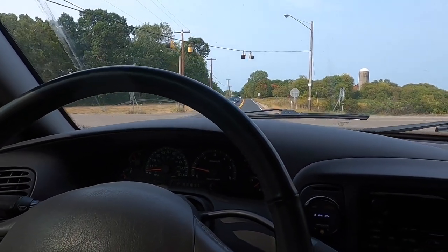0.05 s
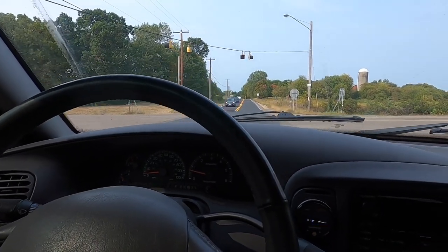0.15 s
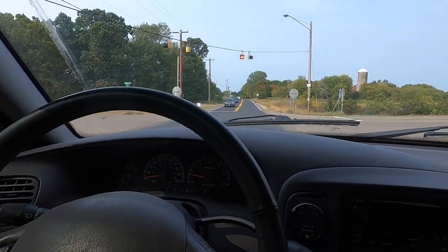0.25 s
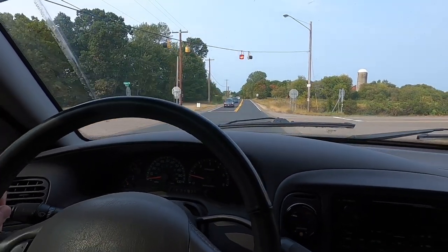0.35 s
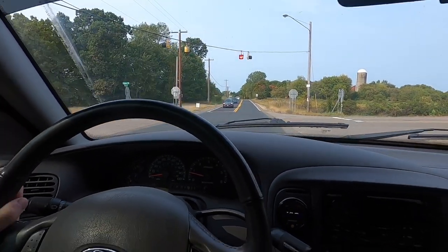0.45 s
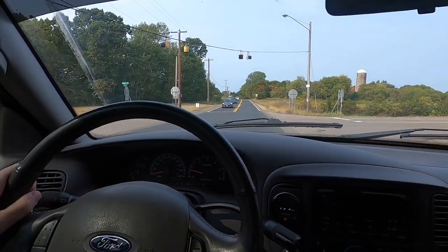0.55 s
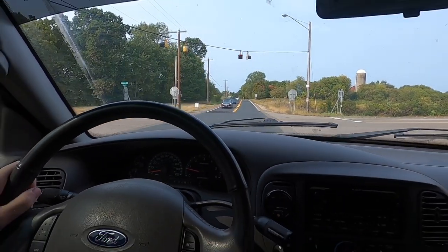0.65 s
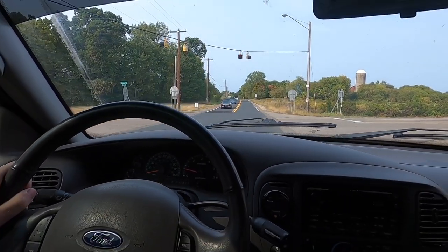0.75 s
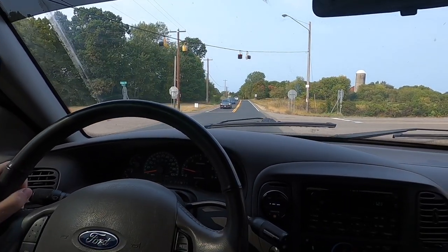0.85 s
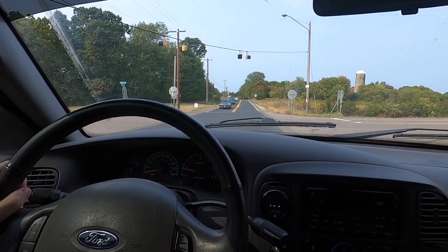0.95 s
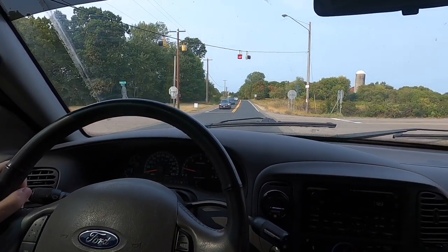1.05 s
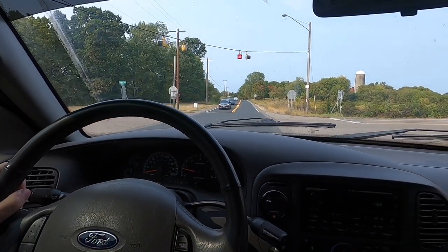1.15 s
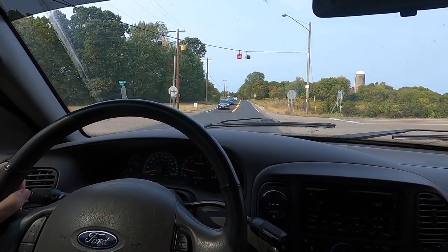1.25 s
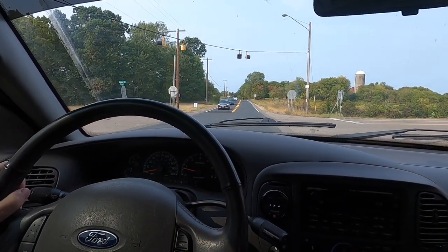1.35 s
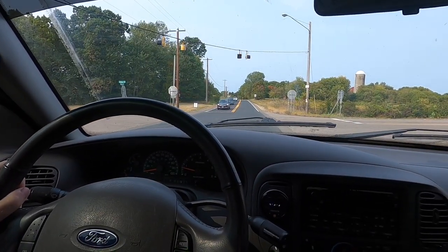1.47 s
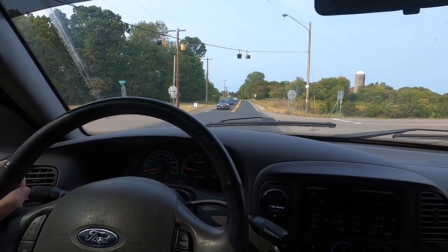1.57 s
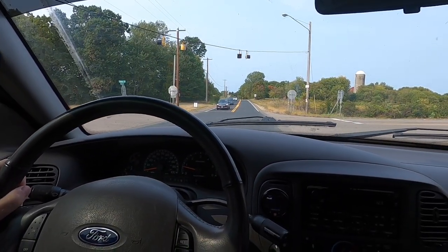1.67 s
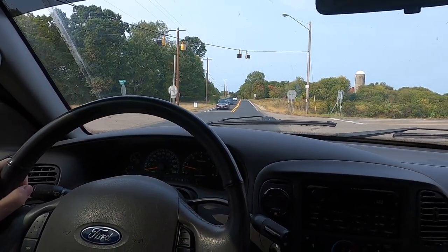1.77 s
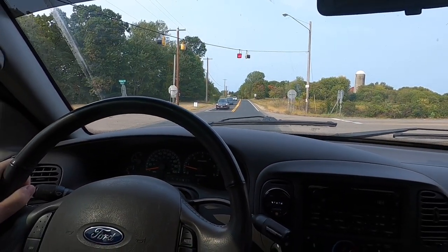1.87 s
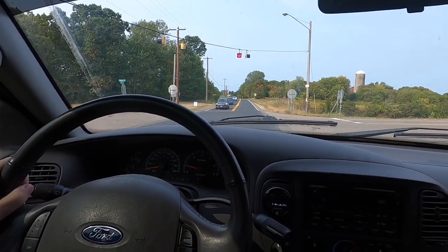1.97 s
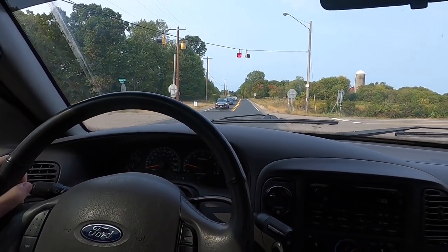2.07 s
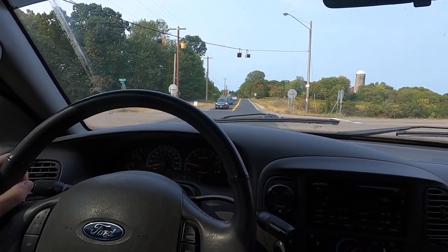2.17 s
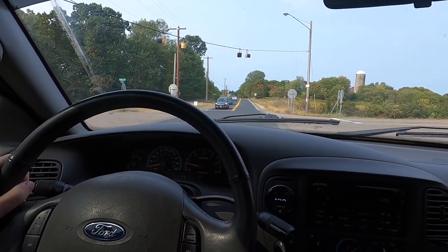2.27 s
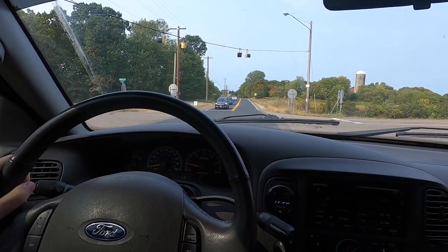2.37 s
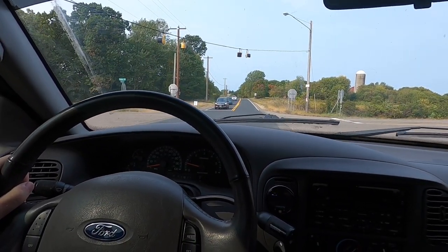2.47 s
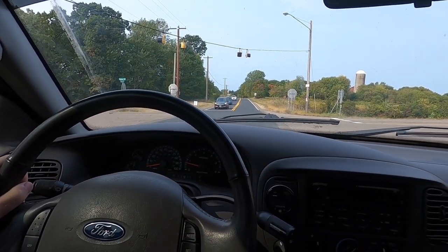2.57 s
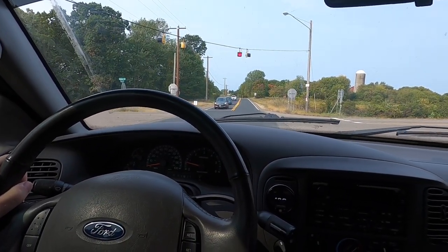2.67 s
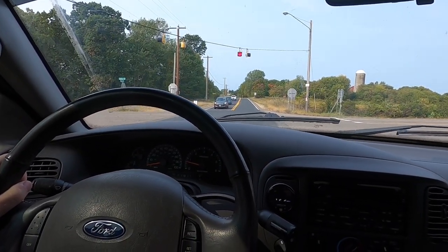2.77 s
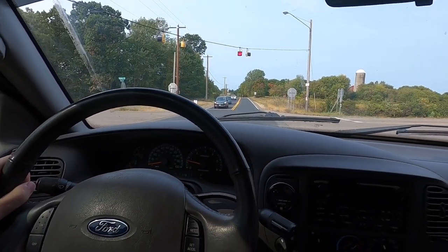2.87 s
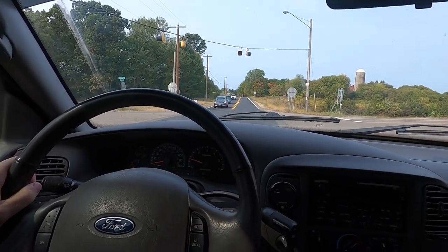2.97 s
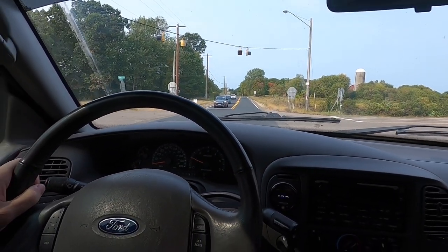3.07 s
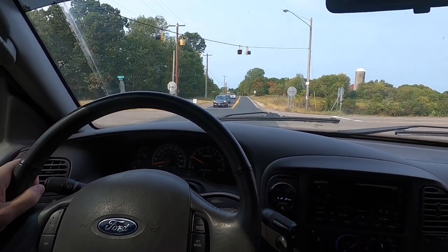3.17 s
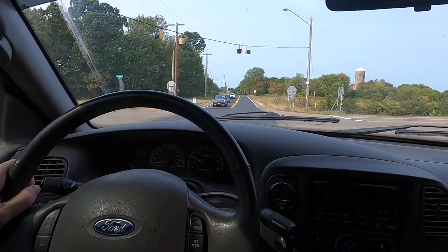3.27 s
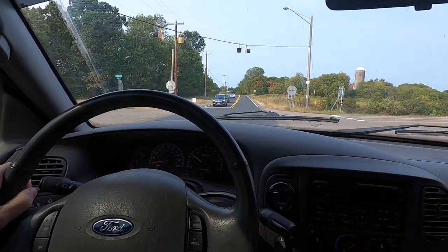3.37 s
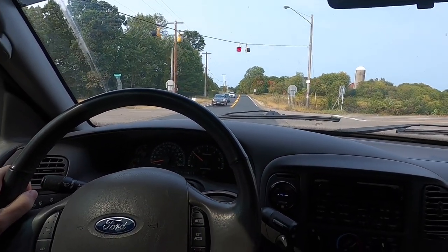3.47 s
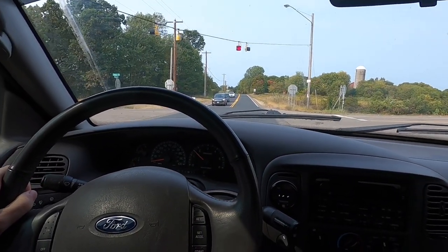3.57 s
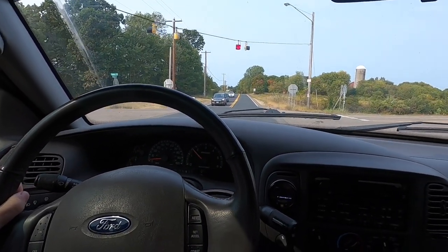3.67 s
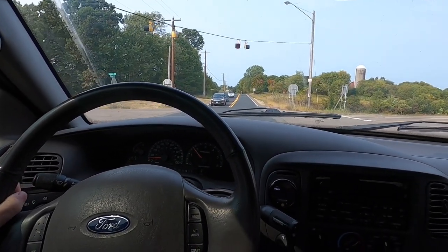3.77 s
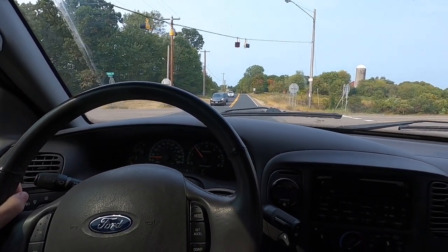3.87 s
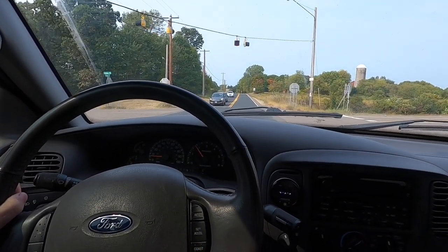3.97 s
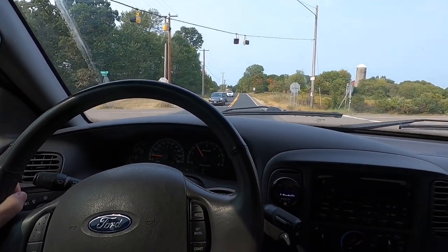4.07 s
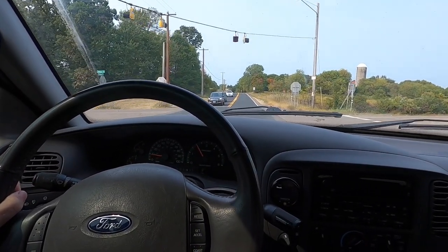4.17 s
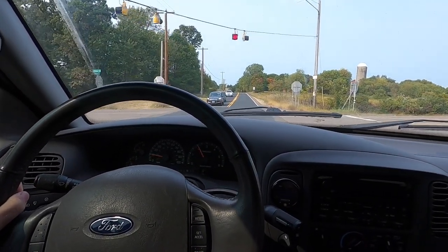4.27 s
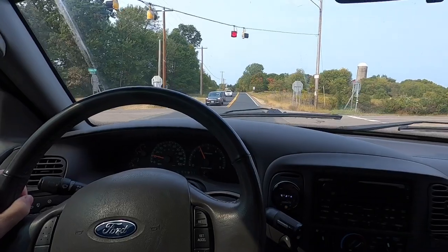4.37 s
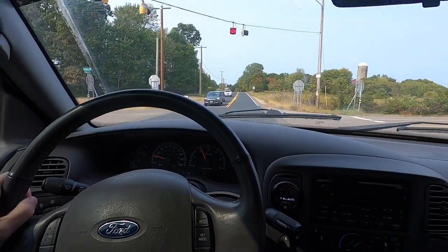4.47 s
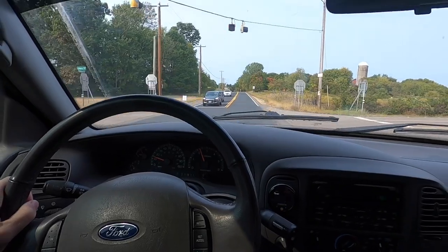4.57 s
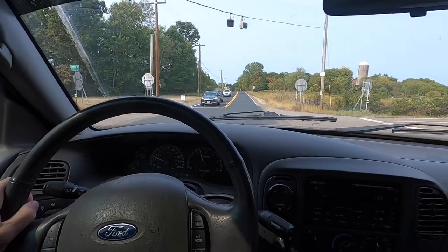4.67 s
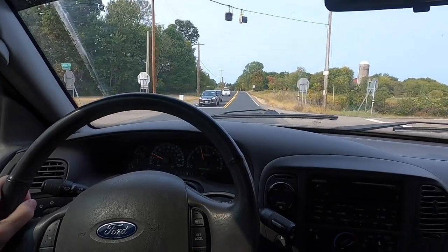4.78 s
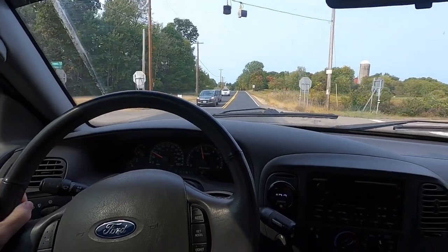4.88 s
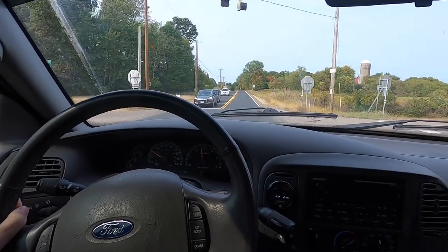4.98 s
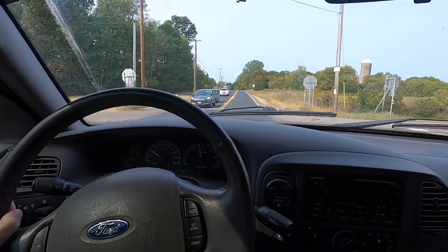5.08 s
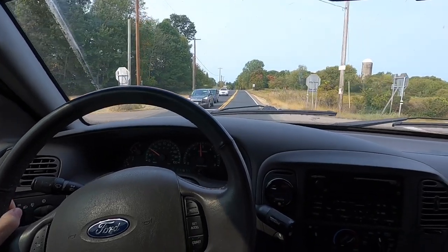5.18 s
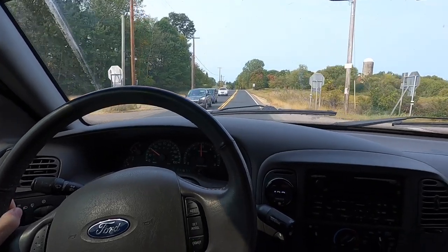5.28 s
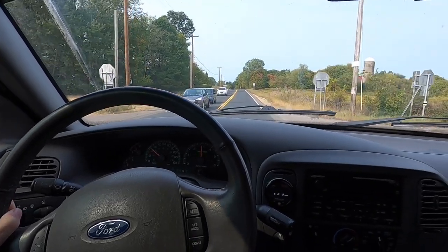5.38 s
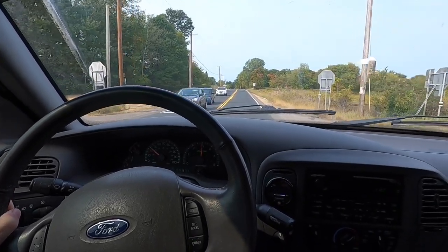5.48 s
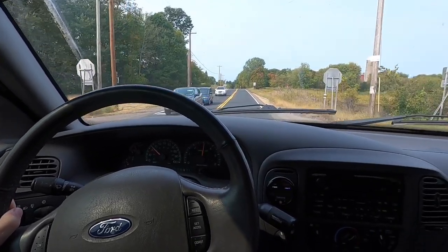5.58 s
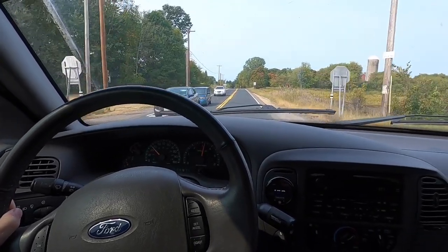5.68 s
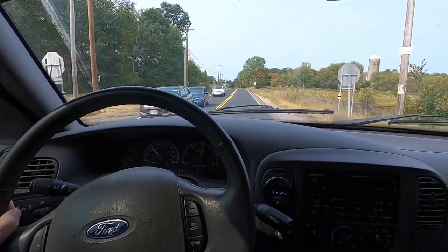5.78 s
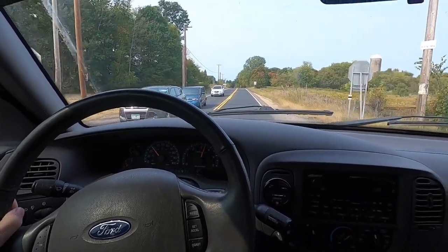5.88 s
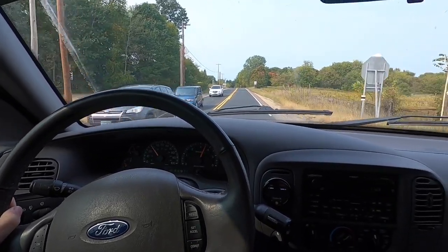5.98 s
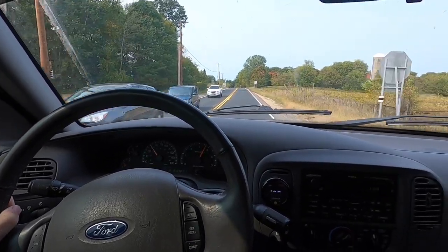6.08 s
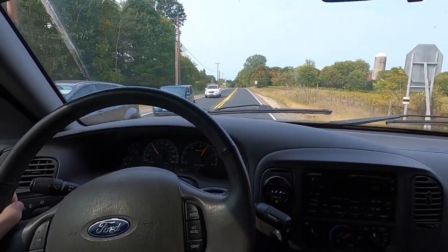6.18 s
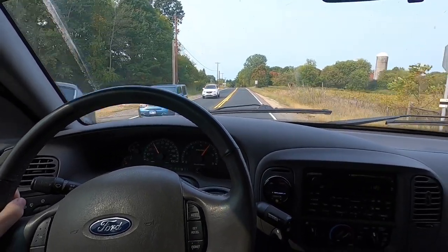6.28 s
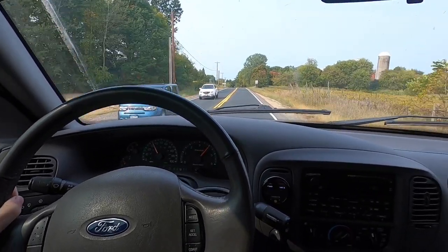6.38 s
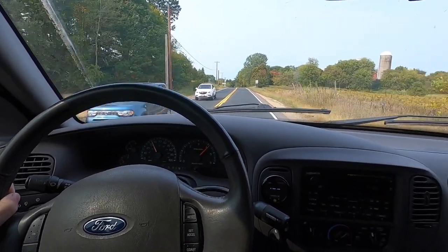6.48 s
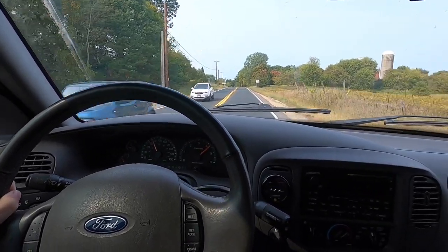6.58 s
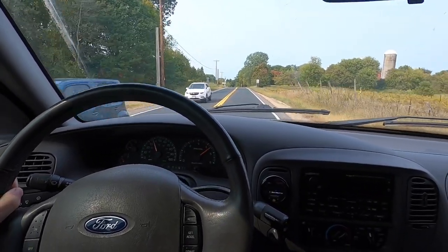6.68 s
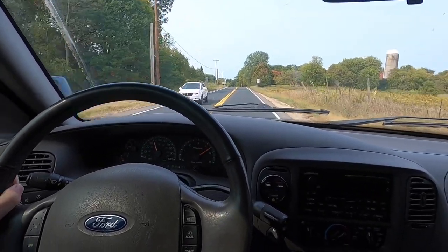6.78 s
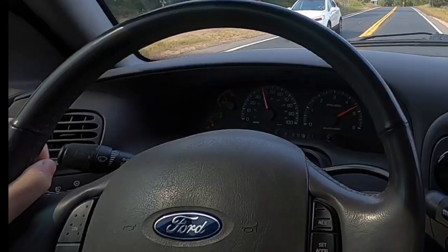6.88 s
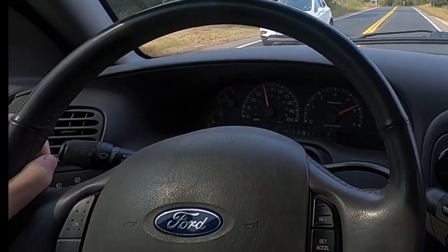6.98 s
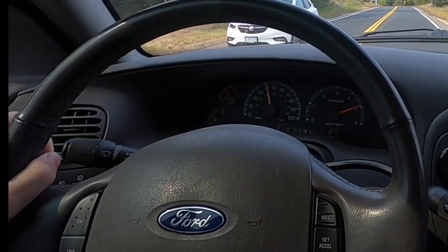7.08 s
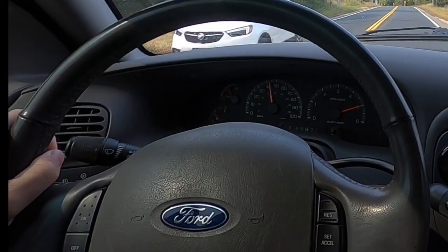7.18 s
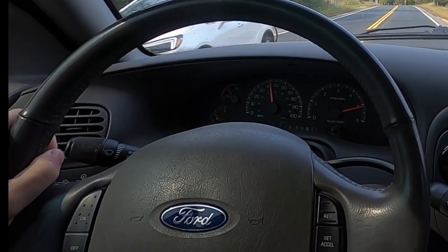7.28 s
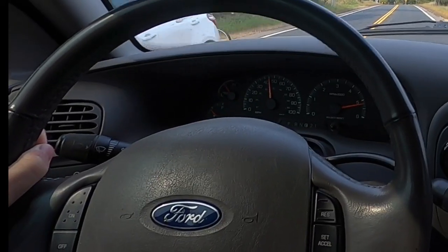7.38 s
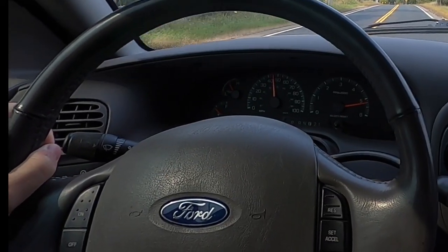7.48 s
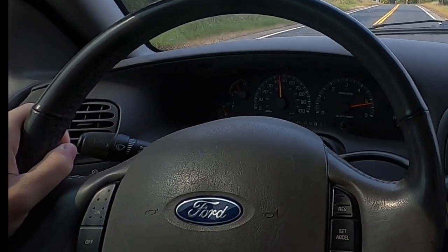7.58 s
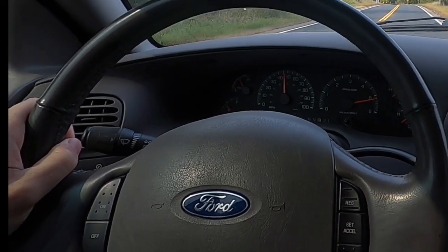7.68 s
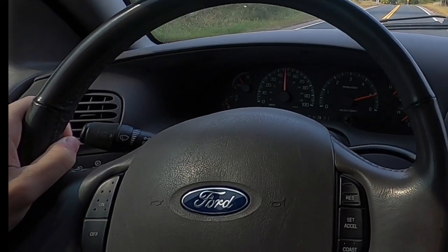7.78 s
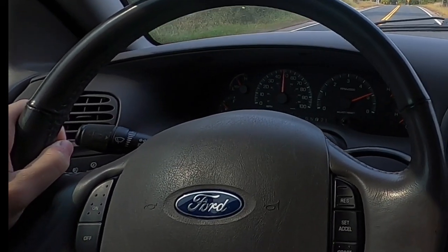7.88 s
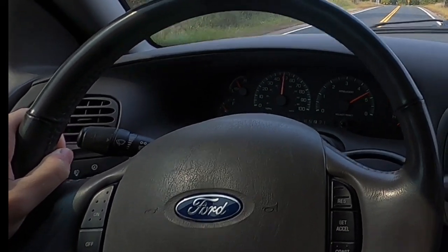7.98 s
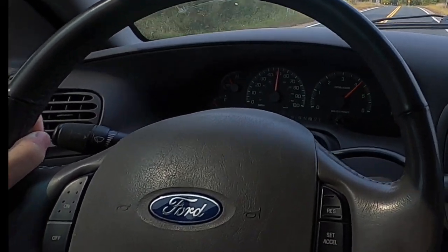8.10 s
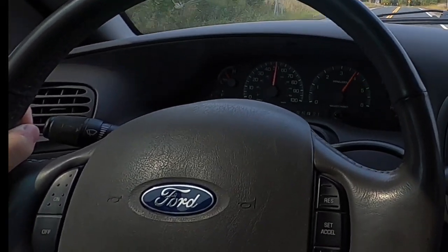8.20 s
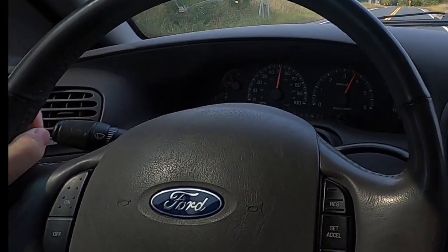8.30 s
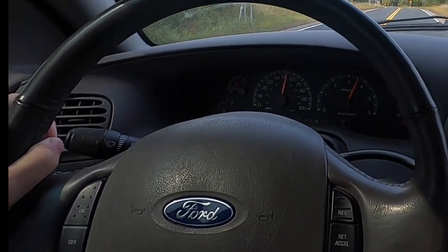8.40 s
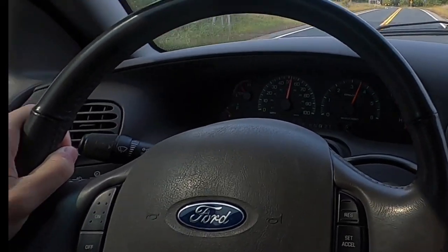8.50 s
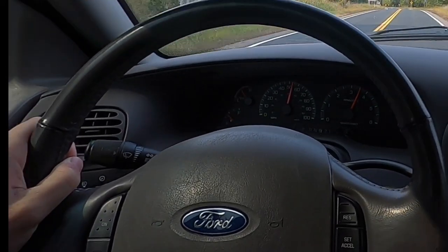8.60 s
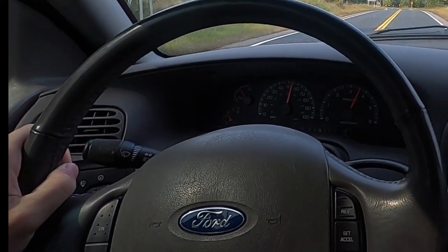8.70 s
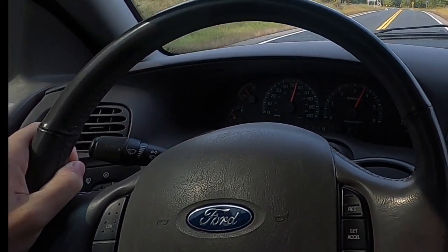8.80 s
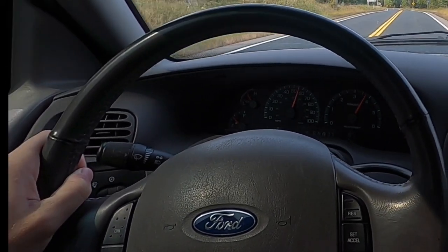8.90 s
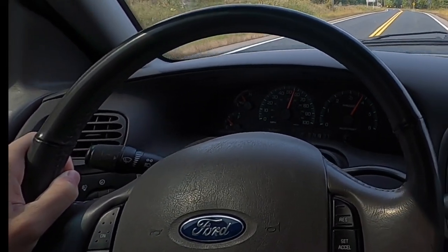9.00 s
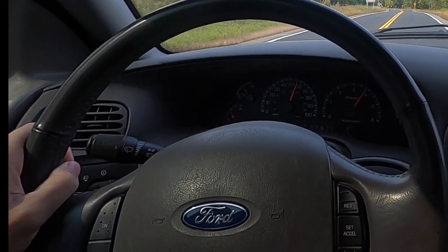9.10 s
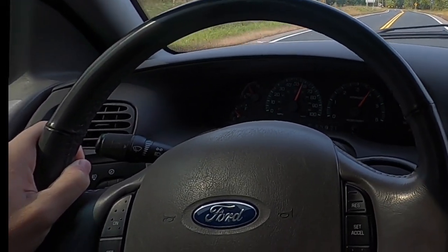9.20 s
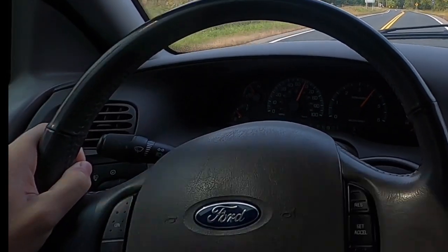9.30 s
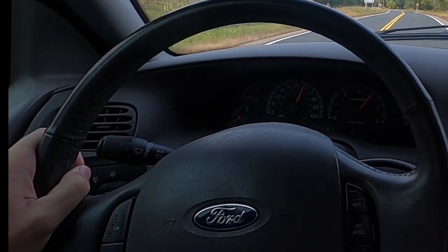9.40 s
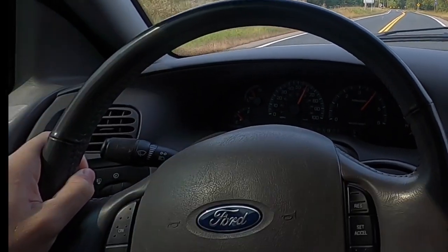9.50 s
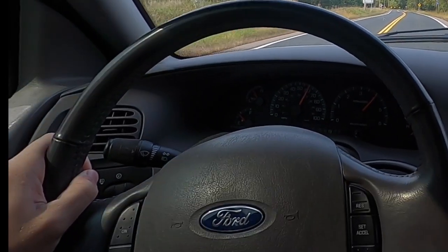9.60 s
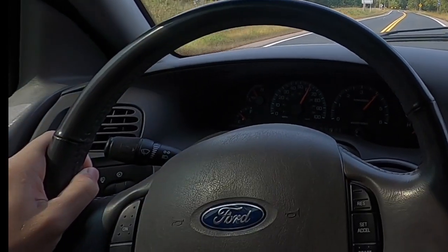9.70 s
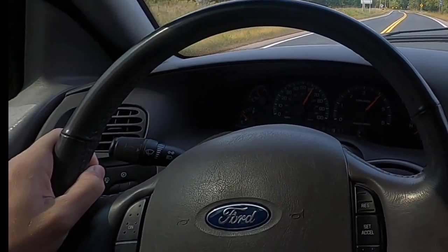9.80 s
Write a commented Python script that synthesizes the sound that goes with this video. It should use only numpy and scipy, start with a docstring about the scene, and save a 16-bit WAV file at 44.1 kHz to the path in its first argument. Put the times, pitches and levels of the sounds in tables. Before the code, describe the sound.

A quiet, low idle rumbles in the cab for under three seconds, with light cloth movement and a dull pedal knock. The big engine then lugs off the mark, dash trim rattling briefly, and accelerates steadily. Uneven exhaust boom, intake hiss and turbo whistle rise together, dip sharply through a single gear change, then build once more. Close stereo microphone at the driver's position.

```python
"""Inside a turbocharged V8 truck

The engine idles, pulls away hard, changes up once and pulls again. Unevenly spaced exhaust pulses, summed
as harmonics of the cycle, boom in the cab. Filtered noise pulsing with the firings makes rumble, burble,
clatter and intake hiss; the turbo sighs, then whistles as a swept tone. A fan and small motors run on.
A sleeve rustles in noise strokes, a pedal thumps as decaying modes, and trim rattles at moving off."""
import sys
import numpy as np
from scipy.fft import rfft, irfft, next_fast_len
from scipy.io import wavfile
from scipy.ndimage import map_coordinates

SR = 44100
rng = np.random.default_rng(int(sys.argv[2]) if len(sys.argv) > 2 else 0)


def store_pcm(level_fs):
    """Save levels as 16-bit WAV."""
    pcm = np.round(np.clip(level_fs, -1, 1) * 32767).astype(np.int16)
    wavfile.write(sys.argv[1], SR, np.atleast_2d(pcm).T)


N = 434385
TIME = np.arange(N) / SR  # s

# engine speed: (time [s], speed [rpm])
ENGINE_SPEED = [(0.0, 625.5), (2.69, 632.5), (3.26, 1384), (3.837, 1907), (4.7, 2474), (4.87, 2664),
                (5.3, 2982), (5.75, 3503), (6.45, 4396), (6.84, 4865), (7.287, 5390), (7.607, 5083),
                (7.88, 4397), (8.06, 3470), (8.413, 3596), (9.093, 3987), (9.42, 4104), (9.85, 4240)]
# the driver's foot: (time [s], throttle opening [0-1])
THROTTLE = [(2.65, 0.06), (3.1, 0.17), (4.15, 0.45), (4.7, 1), (5.7, 0.74), (6.7, 1), (7.3, 0.87),
            (8.2, 0.95), (8.5, 0.72), (8.8, 0.96), (9.85, 1)]
# speed of the turbo: (time [s], whistle [Hz])
TURBO_SPEED = [(2.7, 300), (3.85, 1700), (4.9, 3900), (5.5, 4750), (6, 5620), (6.5, 6280), (6.9, 6760),
               (7.2, 6980), (7.47, 7020), (7.9, 5500), (8.1, 5130), (8.35, 5220), (8.6, 5860), (9, 6540),
               (9.4, 6890), (9.85, 7010)]
# booming orders of the four-stroke cycle, each in its own speed ranges:
# (order [cycles], from [rpm], to [rpm], edge [rpm], level [dB])
BOOM_RANGES = [(3, 1200, 3900, 69, -34.5), (3, 3270, 3723, 120, -10.5), (3, 4090, 6000, 76, -10.5),
               (4, 2400, 5700, 65, -39), (4, 3900, 4300, 87, -24), (4, 3750, 4090, 36, -11),
               (5, 1830, 3870, 190, -17), (5, 2520, 3297, 160, -8), (5, 3800, 5150, 110, -23),
               (8, 260, 1300, 110, -28.5), (8, 1160, 2380, 60, -23), (8, 1760, 2150, 30, -14.5),
               (8, 2400, 4000, 72, -33), (8, 3640, 4367, 79, -21), (8, 4225, 5700, 54, -23.5),
               (9, 2650, 2500, 57, -27), (16, 3030, 3300, 50, -31.5)]
# weaker exhaust orders: (order [cycles], relative level [dB])
WEAK_ORDERS = [(1.0, 9.5), (2.0, 2.5), (6.0, 4), (7.0, 0), (9.0, 1), (10.0, -2.5), (11.0, 5.5), (12.0, -1),
               (13.0, 7.5), (14.0, 3.8), (15.0, -1), (16.0, 10), (17.0, 4.5), (18.0, -10), (19.0, 5.5),
               (20.0, -11.5), (21.0, 7.5), (22.0, 4), (23.0, -2), (24.0, 2.5), (25.0, 1.5), (26.0, 1.5),
               (27.0, -1), (28.0, -6), (29.0, -10), (30.0, 1.5), (31.0, -7), (32.0, -4.5)]
# their path through pipe and cab: (frequency [Hz], gain [dB])
PIPE_RESPONSE = [(30, -12), (70, -2), (130, 7), (180, -1), (230, 0), (280, -1.5), (350, -5.5), (440, -4),
                 (520, -18), (620, -21), (720, -21), (900, -20), (1150, -23), (1500, -29)]
# chassis heaves: (time [s], half length [s], level [dB])
CHASSIS_HEAVES = [(2.915, 0.076, -25), (4.203, .25, -31), (4.578, .14, -23), (5.699, .2, -33.5),
                  (6.403, 0.14, -32.5), (7.969, .12, -27)]
# engine speeds at which the clatter flares or thins: (speed [rpm], half width [rpm], change [dB])
CLATTER_FLARES = [(3560, 200, -1), (4820, 310, 4)]
# strokes of the sleeve: (start [s], length [s], level [dB])
SLEEVE_STROKES = [(0.28, 0.24, -61), (0.466, 0.31, -57.5), (1.78, 0.18, -62.5), (1.948, 0.19, -54.5),
                  (2.02, 0.68, -69), (3.02, 0.16, -62)]
# pedal, driveline and trim knocks:
# (time [s], click [dB], click brightness [dB/octave], relative knock [dB], relative thump [dB])
CONTACTS = [(2.182, -56, 4, -42, -27), (2.551, -37.5, -1, -43.5, -13.5), (2.887, -68, -1, -56, -26),
            (2.915, -51, -8, -60, -34.5), (3.28, -57, -3, -69, -52.5), (3.545, -50, -6, -52, -47.5),
            (3.562, -45, -11, -40, -38), (3.64, -41.5, -12.5, -51.5, -44), (3.659, -39, -8, -42, -30.5),
            (3.682, -34.5, -14, -35.5, -42.5), (3.69, -35, -15.5, -32.5, -43),
            (3.73, -35.5, 8, -36.5, -49.5), (3.735, -41, 6.5, -50, -38)]
# modes of the floor pan: (frequency [Hz], relative level [dB], decay by 60 dB [s])
FLOORPAN_MODES = [(80.5, 2.5, 0.12), (131, -2.5, 0.18), (244.5, -5.5, 0.07), (408, -11, 0.066)]
# firewall and dash resonances: (frequency [Hz], width [Hz], gain [dB])
DASH_RESONANCES = [(540, 59, 2), (690.6, 33, 5.5), (820, 30, 2.5), (897, 72, 6), (1008, 66, 8),
                   (1119, 64, 9), (1304, 220, 7), (1476, 61, 10), (1563, 83, 9.5), (1680, 45, 6.5),
                   (1835, 97, 3.5), (2040, 35, 4.5), (2089, 31, -1.5), (2250, 19, 10.5), (2880, 90, 2.5),
                   (3080, 76, 3.5), (3340, 42, 5), (3420, 52, 1.5), (3820, 74, 4), (4110, 71, 5),
                   (4270, 40, 7.5), (4990, 81, 4.5), (5300, 120, 4), (5700, 260, 4)]
# small electric motors: (frequency [Hz], relative level [dB])
MOTOR_WHINE = [(931.3, -91.5), (1044, -75), (1120, -91.5), (1680, -83)]

# noise colours, each: (frequency [Hz], relative density [dB per Hz])
RUMBLE_COLOUR = [(6, -28.5), (15, -6.5), (27, 1), (45, -3.5), (65, -6.5), (100, -32.5), (200, -86.5)]
BURBLE_COLOUR = [(40, -37.5), (68, -5.5), (88, 3), (125, -1.5), (165, -6), (205, -10), (240, -9.5),
                 (300, -12.5), (410, -19.5), (490, -30.5), (620, -40), (1000, -59), (2000, -110)]
CLATTER_COLOUR = [(250, -40.5), (420, 10), (550, 3), (900, -1.5), (1300, -7), (1700, -15.5), (3000, -58.5)]
INTAKE_COLOUR = [(800, -31.5), (1300, -6), (1550, -4), (1900, -2), (2900, -3.5), (4200, -11.5), (5200, -20),
                 (8000, -56.5)]
AIR_COLOUR = [(2500, -30), (4300, -2), (5400, 0), (6000, -3), (7000, -2.5), (8300, -5), (9500, -14),
              (11000, -18), (15000, -31)]
CLOTH_COLOUR = [(900, -4), (2000, 0.5), (3300, -1.5), (6000, -5.5), (8000, -11.5), (10000, -24),
                (15000, -44)]
FAN_COLOUR = [(200, -15.5), (500, 0), (800, -4), (1100, 2), (1400, -5), (1650, -4.5), (2000, -10.5),
              (3500, -19), (5500, -17), (8000, -25), (11000, -40), (15000, -51.5)]
CLICK_COLOUR = [(400, -37), (1400, -5), (3300, 2), (6000, -10), (9000, -25), (14000, -38)]
KNOCK_COLOUR = [(150, -20), (400, 11.5), (800, -6), (1500, -8), (2500, -26), (6000, -54)]
TRIM_COLOUR = [(600, -31), (770, -4.5), (900, -15), (1130, -2), (1300, -15.5), (1560, -3.5), (1750, -9.5),
               (2200, -16.5), (3200, -42)]

# how each layer follows the engine: (level flat out [dB], speed [dB per doubling],
# no boost to full [dB], shut throttle to open [dB], extra in the gear change [dB])
EXHAUST_LAW = (-30.5, -0.44, 18.5, 0.5, -1.5)
BURBLE_LAW = (-32.5, -2, 0.7, -0.3, -0.5)
ROAR_LAW = (-36.5, 0, 3, -3, 1.5)
CLATTER_LAW = (-33, 4, 7, 12.5, 6)
INTAKE_LAW = (-37.5, 4, 1.05, 19.5, -1)
AIR_LAW = (-52, 4.3, 6, 6, -3.8)
WHISTLE_LAW = (-59.5, -2, 6.5, 6.5, -3.5)

# likeness of the two sides of a diffuse noise: (frequency [Hz], correlation [0-1])
LIKENESS = [(60, .99), (250, .97), (500, .8), (1100, .92), (2500, .68), (5000, .3), (10000, .25)]
# left level above right: (frequency [Hz], difference [dB])
LEFT_LEAN = [(30, -7), (60, 2.1), (130, 1.4), (290, 2.5), (640, 1.5), (1410, 1), (3100, 4), (7000, 0.5)]
# left phase behind right: (frequency [Hz], lag [radians])
LEFT_LAG = [(50, .02), (130, 0.22), (300, 0.37), (600, 0.41), (950, .2), (1550, 0.66), (6400, .8)]

TOP_HZ = 15700  # band limit
FULL_RPM, FULL_BOOST_HZ = 5000, 7000  # engine speed and whistle that count as flat out
LAUNCH_S, LAUNCH_RISE_S = 2.78, .12
SHIFT_S, SHIFT_WIDTH_S = 7.82, .28
BITE_S, BITE_WIDTH_S, BITE_DB = 7.955, .05, -8  # the next gear bites and the boom ducks
IDLE_RUMBLE_DB, ROAD_RUMBLE_DB, IDLE_BURBLE_DB = -34, -35.5, -36.5
LUG_RPM, LUG_WIDTH_RPM, LUG_DB = 1730, 350, 5  # extra burble while the engine lugs
SPOOL_HZ, SPOOL_WIDTH_HZ, SPOOL_DB = 2790, 800, -54.5  # turbo speeds at which the compressor sighs
BUZZ_S, BUZZ_DB, BUZZ_FADE_DB_PER_S = 3.666, -44, 46.5  # trim peak, and its fall to either side


def amp(db):
    """Logarithmic level: decibels become a pressure ratio."""
    return 10 ** (np.asarray(db) / 20)


def unit(x):
    """Energy normalisation: scale to rms 1."""
    return x / np.sqrt(np.mean(x ** 2) + 1e-20)


def along(points, hz):
    """Logarithmic pitch axis: read (Hz, value) points between knots."""
    f, v = np.transpose(points)
    return np.interp(np.log(hz + 1), np.log(f + 1), v)


def curves(rows):
    """Linear interpolation: one value per sample for each column after the time."""
    s, *columns = np.transpose(rows)
    return [np.interp(TIME, s, column) for column in columns]


def swell(x, centre, width):
    """Gaussian bell: 1 at the centre, 1/e one width away."""
    return np.exp(-((x - centre) / width) ** 2)


def wobble(rate):
    """Band-limited randomness: a smooth curve through rate random knots a second."""
    knots = rng.standard_normal(int(N * rate / SR) + 4)
    coarse = np.arange(0, N + 16, 16)
    smooth = map_coordinates(knots, [coarse * rate / SR], mode="nearest")
    return np.interp(np.arange(N), coarse, smooth)


def filtered(x, response):
    """Linear filtering: multiply the spectrum by a response of frequency."""
    m = next_fast_len(N + SR // 4)
    return irfft(rfft(x, m) * response(np.fft.rfftfreq(m, 1 / SR)), m)[..., :N]


def panels(hz):
    """Modal transmission: narrow dash resonances stand above the flat leakage."""
    grid = np.arange(0, SR // 2, 4)
    db = sum(peak_db / (1 + (2 * (grid - centre) / width) ** 4)
             for centre, width, peak_db in DASH_RESONANCES)
    return amp(np.interp(hz, grid, db))


def rush(colour, through_dash=False):
    """Diffuse field: stereo noise of rms 1 whose sides grow less alike toward the treble."""
    def response(hz):
        turn = np.arccos(np.clip(along(LIKENESS, hz), -1, 1)) / 2
        ring = panels(hz) if through_dash else 1
        return amp(along(colour, hz)) * ring * np.array([np.cos(turn), np.sin(turn)])
    mid, side = filtered(rng.standard_normal((2, N)), response)
    return unit(np.array([mid + side, mid - side]))


def boost():
    """Centrifugal compression: boost pressure grows with the square of turbo speed."""
    return (curves(TURBO_SPEED)[0] / FULL_BOOST_HZ) ** 2


def launched():
    """Load gate: 0 at idle, 1 once the engine pulls."""
    return np.clip((TIME - LAUNCH_S) / LAUNCH_RISE_S, 0, 1)


def level(law):
    """Source strength: a layer's dB follows engine speed, boost, throttle and the gear change."""
    full_db, speed_db, boost_db, throttle_db, shift_db = law
    rpm, = curves(ENGINE_SPEED)
    throttle, = curves(THROTTLE)
    db = full_db + speed_db * np.log2(rpm / FULL_RPM)
    db = db + boost_db * (boost() - 1) + throttle_db * (throttle - 1)
    return db + shift_db * swell(TIME, SHIFT_S, SHIFT_WIDTH_S)


def crank(flutter):
    """Four-stroke kinematics: two turns make one cycle, whose angle advances with a slight flutter."""
    cycle_hz = curves(ENGINE_SPEED)[0] / 120
    angle = 2 * np.pi * np.cumsum(cycle_hz * (1 + flutter * wobble(25))) / SR
    return cycle_hz, angle


def throb(angle, firing, lope):
    """Pulsating flow: gas swells at each of eight firings, and with the strongest cylinders each cycle."""
    return unit(np.exp(firing * np.cos(8 * angle) + lope * (np.cos(3 * angle) + np.cos(angle))))


def boom(angle, waver_db):
    """Cavity resonance: uneven banks let orders 3, 4 and 5 take turns with the firing order in the cab."""
    rpm, = curves(ENGINE_SPEED)
    gains = {}
    for k, low, high, edge, db in BOOM_RANGES:
        above = 1 + np.tanh((rpm - low) / edge / 2)
        below = 1 + np.tanh((high - rpm) / edge / 2)
        gain = amp(db) * above * below / 4
        gains[k] = np.maximum(gains.get(k, 0), gain)  # the louder range of an order wins
    out = 0
    for k, gain in gains.items():
        tone = np.sin(k * angle + rng.uniform(0, 2 * np.pi))
        out = out + gain * amp(waver_db * wobble(14)) * tone
    return amp(BITE_DB * swell(TIME, BITE_S, BITE_WIDTH_S)) * out


def shake(angle):
    """Turbulent flow noise: chassis rumble, and an exhaust that burbles and roars under load."""
    heaves = sum(amp(db) * swell(TIME, s, width) for s, width, db in CHASSIS_HEAVES)
    rumble = amp(IDLE_RUMBLE_DB + (ROAD_RUMBLE_DB - IDLE_RUMBLE_DB) * launched()) + heaves
    lug_db = LUG_DB * swell(curves(ENGINE_SPEED)[0], LUG_RPM, LUG_WIDTH_RPM)
    loaded = launched() * amp(level(BURBLE_LAW) + lug_db + 0.56 * wobble(7))
    burble = np.maximum(amp(IDLE_BURBLE_DB), loaded) * rush(BURBLE_COLOUR)
    # the roar is burble with its bass held back
    bright = unit(filtered(rush(BURBLE_COLOUR), lambda hz: along([(220, 0.067), (420, 1)], hz)))
    roar = launched() * amp(level(ROAR_LAW)) * bright
    return rumble * rush(RUMBLE_COLOUR) + (burble + roar) * throb(angle, firing=0.32, lope=0.06)


def fan_and_motors():
    """Steady rotation: air noise from a soft fan, and near-pure tones from small electric motors."""
    turns = np.cumsum(1 + 0.0026 * wobble(11)) / SR
    whine = sum(amp(db + 4.5 + 2.5 * wobble(21)) * np.sin(2 * np.pi * hz * turns)
                for hz, db in MOTOR_WHINE)
    return whine + amp(-67) * rush(FAN_COLOUR)


def sleeve(grain_db):
    """Sliding friction: cloth moves over wheel and seat in short grainy strokes."""
    strokes = sum(amp(db) * np.sin(np.pi * np.clip((TIME - s) / length, 0, 1))
                  for s, length, db in SLEEVE_STROKES)
    return strokes * unit(rush(CLOTH_COLOUR) * amp(grain_db * wobble(150)))


def knocks(click_t60, knock_t60, thump_rise):
    """Impact excitation: each contact clicks, knocks and may set decaying floor-pan modes ringing."""
    out = np.zeros((2, N))
    t = np.arange(SR // 4) / SR
    octaves = np.log2(np.clip(np.fft.rfftfreq(len(t), 1 / SR), 1000, None) / 3000)
    clicks, hollow = rush(CLICK_COLOUR), rush(KNOCK_COLOUR)
    modes = sum(amp(db - 60 * t / t60) * np.sin(2 * np.pi * hz * t) for hz, db, t60 in FLOORPAN_MODES)
    for s, click_db, bright_db, knock_db, thump_db in CONTACTS:
        start = round(s * SR)
        span = slice(start, start + len(t))
        click = unit(irfft(rfft(clicks[:, span]) * amp(bright_db * octaves), len(t)))
        click = click * amp(click_db - 60 * t / click_t60)
        knock = hollow[:, span] * amp(knock_db + 7.5 - 60 * t / knock_t60)
        thump = amp(thump_db + 2.5) * modes * (1 - np.exp(-t / thump_rise))
        out[:, span] += (click + knock) * (1 - np.exp(-t / 0.00097)) + thump
    return out


def rasp(angle, count):
    """Periodicity: clatter repeated every cycle is a dense stack of orders sweeping the dash resonances."""
    phases = rng.uniform(0, 2 * np.pi, count) + 0.74 * rng.standard_normal((2, count))
    cycle = irfft(rng.rayleigh(size=count) * np.exp(1j * phases), 4096)
    place = (angle + .003 * wobble(60)) / (2 * np.pi) % 1 * cycle.shape[1]
    sides = np.array([np.interp(place, np.arange(len(side)), side) for side in cycle])
    return unit(filtered(sides, lambda hz: amp(along(CLATTER_COLOUR, hz)) * panels(hz)))


def engine_bay(cycle_hz, angle):
    """Amplitude modulation: clatter and intake rush pass the dash, pulsing with the firings."""
    rpm, = curves(ENGINE_SPEED)
    opened = np.interp(TIME, [2.2, 2.7], [0, 1])
    flares_db = sum(db * swell(rpm, centre, width) for centre, width, db in CLATTER_FLARES)
    clatter_db = level(CLATTER_LAW) + flares_db + 1.3 * wobble(12)
    intake_db = level(INTAKE_LAW) + 0.4 * wobble(10)
    # the faster the engine turns, the more alike its cycles become
    regular = .85 * cycle_hz / cycle_hz.max()
    loose = rush(CLATTER_COLOUR, through_dash=True) * throb(angle, firing=0.48, lope=.14)
    clatter = np.sqrt(regular) * rasp(angle, count=160) + np.sqrt(1 - regular) * loose
    intake = rush(INTAKE_COLOUR, through_dash=True) * throb(angle, firing=0.082, lope=0.054)
    air = rush(AIR_COLOUR, through_dash=True) * throb(angle, firing=.15, lope=0.069)
    return opened * (amp(clatter_db) * clatter + amp(intake_db) * intake + amp(level(AIR_LAW)) * air)


def exhaust(cycle_hz, angle, waver_db, rough, spread):
    """Harmonic series: weaker orders sweep the pipe response; uneven combustion roughens high ones most."""
    out = np.zeros((2, N))
    scatter = rough * wobble(70) + .008 * wobble(200)
    for k, db in WEAK_ORDERS:
        gain = amp(db + along(PIPE_RESPONSE, k * cycle_hz) + waver_db * wobble(9))
        phase = k * (angle + scatter) + rng.uniform(0, 2 * np.pi)
        apart = spread * k * rng.standard_normal()  # short waves reach the two sides out of step
        out += gain * np.array([np.sin(phase + apart), np.sin(phase - apart)])
    # the high orders flare and fade as they cross the dash resonances
    return filtered(out * launched() * amp(level(EXHAUST_LAW)), panels)


def turbo(waver):
    """Blade-passing tone: the compressor sighs in a narrow band, then hardens to a tone as boost builds."""
    hz, = curves(TURBO_SPEED)
    breathy = np.interp(boost(), [.4, .95], [.97, .4])
    phase = 2 * np.pi * np.cumsum(hz * (1 + waver * wobble(40))) / SR

    def band(rate):
        """Quadrature modulation: noise about as wide as the knot rate, centred on the whistle."""
        return unit(np.array([wobble(rate) * np.sin(phase) + wobble(rate) * np.cos(phase)
                              for _ in range(2)]))

    tone = unit(np.array([(1 + 0.46 * wobble(25)) * np.sin(phase) for _ in range(2)]))
    mixed = np.sqrt(1 - breathy) * tone + np.sqrt(breathy) * band(230)
    whistle = launched() * amp(level(WHISTLE_LAW)) * mixed
    sigh = amp(SPOOL_DB) * swell(hz, SPOOL_HZ, SPOOL_WIDTH_HZ) * band(600)
    return whistle + sigh


def trim_buzz(angle):
    """Forced vibration: under load at low revs the firings shake a loose piece of the dash."""
    db = BUZZ_DB - BUZZ_FADE_DB_PER_S * np.abs(TIME - BUZZ_S)
    buzz = rush(TRIM_COLOUR, through_dash=True) * throb(angle, firing=.5, lope=.2)
    return amp(db + 3.6 * wobble(25)) * buzz


def scene():
    """Superposition: all sources add at the driver's seat."""
    cycle_hz, angle = crank(flutter=.0015)  # fraction of speed
    engine = boom(angle, waver_db=1.05)
    engine = engine + exhaust(cycle_hz, angle, waver_db=3.5, rough=0.0098, spread=0.0078)  # radians
    noise = shake(angle) + engine_bay(cycle_hz, angle) + fan_and_motors()
    cab = sleeve(grain_db=0.5) + knocks(click_t60=0.071, knock_t60=0.11, thump_rise=0.0049)  # s
    return engine + noise + turbo(waver=.001) + trim_buzz(angle) + cab


def record(dry):
    """Interchannel difference: level and phase part the two sides, below the band limit."""
    side = np.array([[1], [-1]])  # left, right

    def response(hz):
        lean = amp(side * along(LEFT_LEAN, hz) / 2)
        lag = np.exp(-1j * side * along(LEFT_LAG, hz) / 2)
        return lean * lag * (hz < TOP_HZ)

    return filtered(dry, response)


dry = scene()
out = record(dry)
store_pcm(out)
```